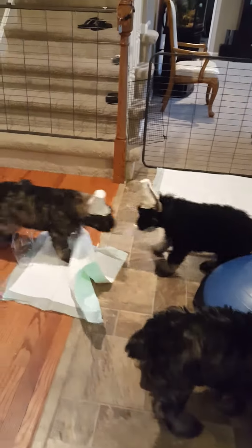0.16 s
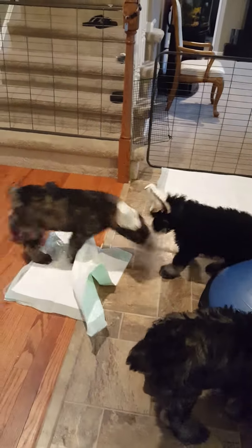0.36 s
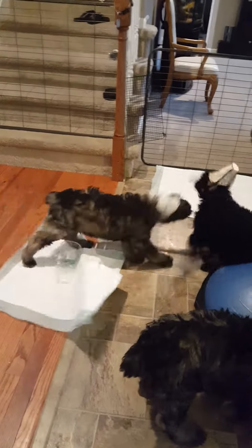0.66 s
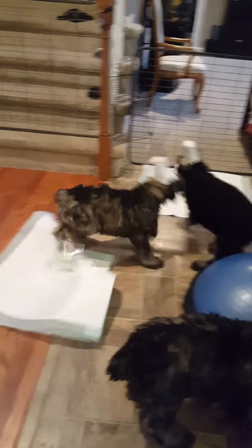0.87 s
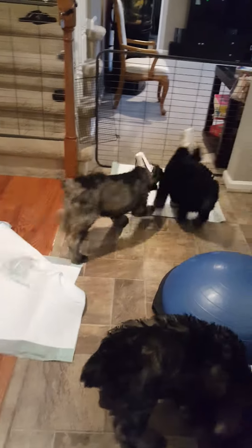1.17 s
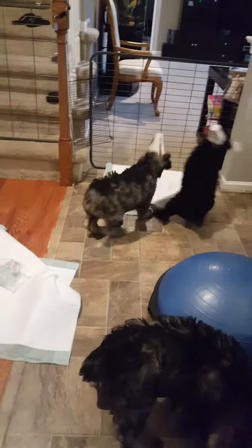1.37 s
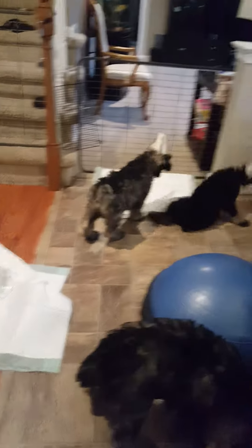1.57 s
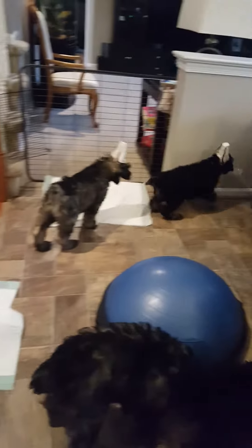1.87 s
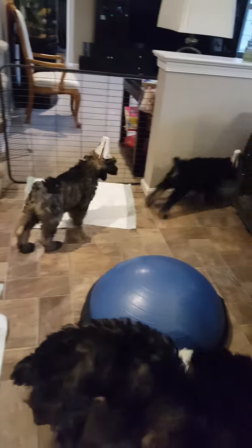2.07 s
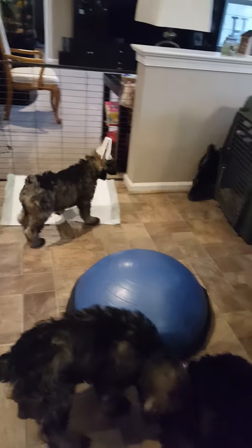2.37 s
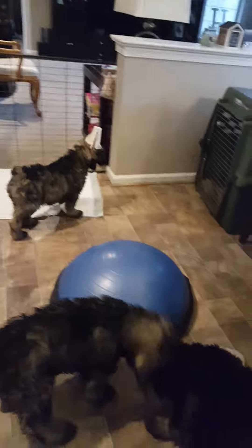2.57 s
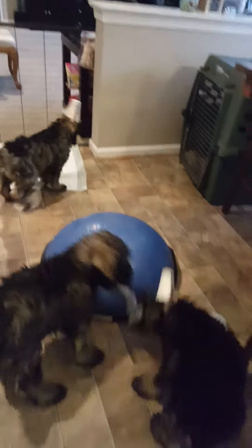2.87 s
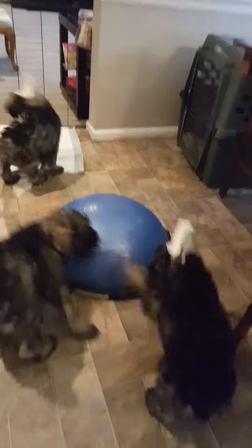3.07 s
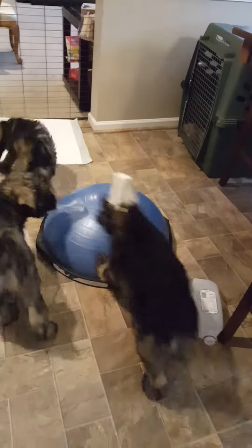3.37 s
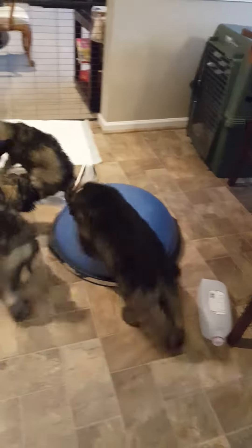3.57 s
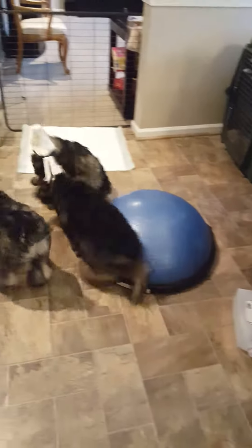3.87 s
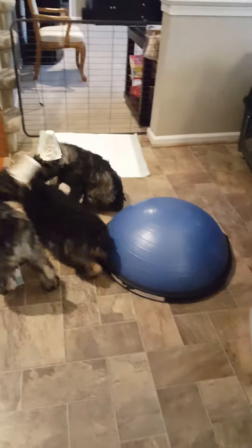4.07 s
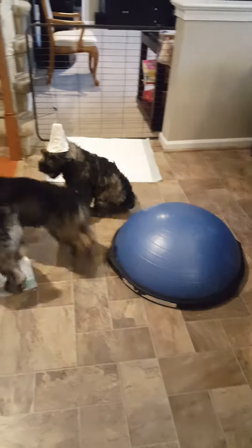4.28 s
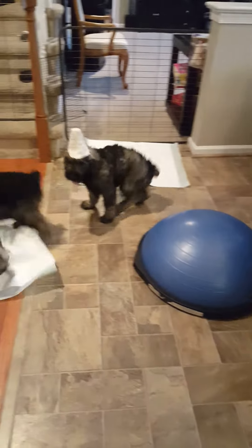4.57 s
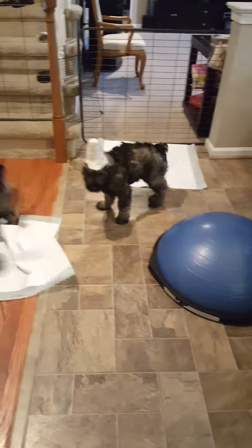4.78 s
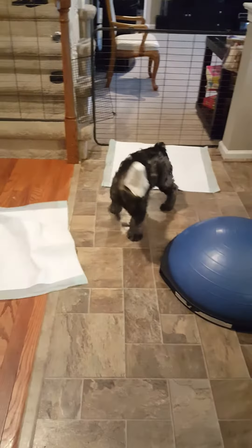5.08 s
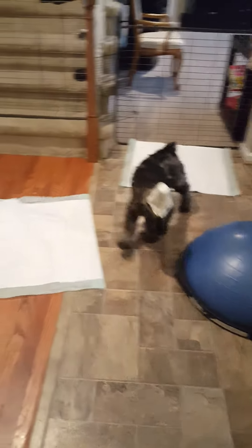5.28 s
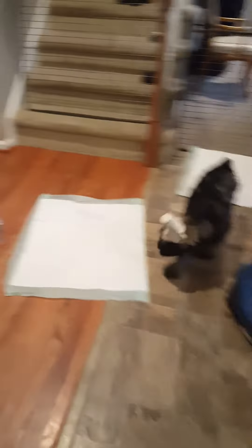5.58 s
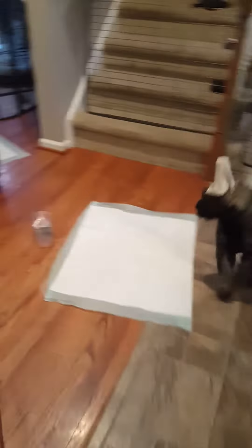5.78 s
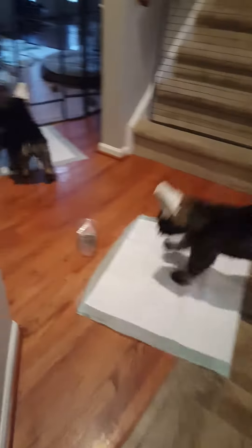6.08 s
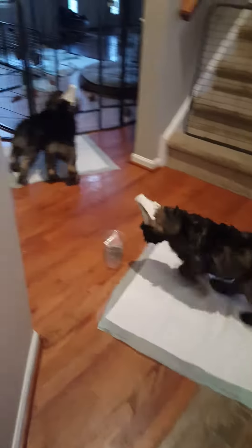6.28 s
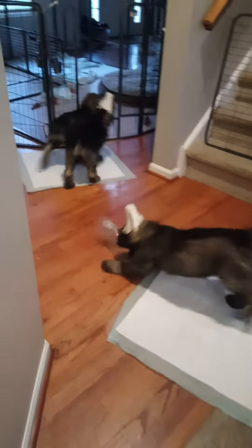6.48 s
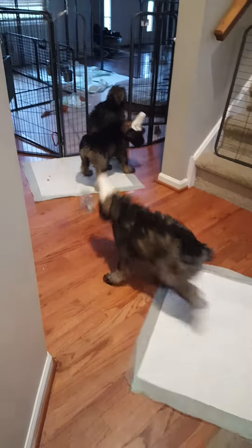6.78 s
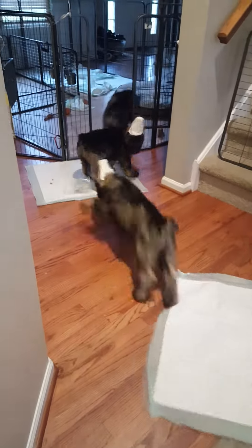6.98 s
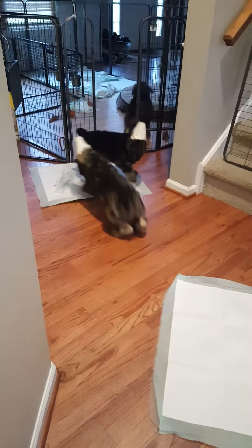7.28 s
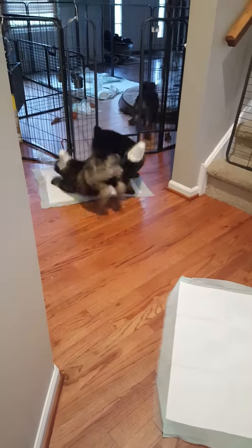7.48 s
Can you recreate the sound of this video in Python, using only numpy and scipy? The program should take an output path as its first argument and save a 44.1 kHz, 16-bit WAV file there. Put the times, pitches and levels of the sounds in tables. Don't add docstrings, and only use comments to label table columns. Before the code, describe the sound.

In a hard-walled home hall, puppies romp around an empty plastic bottle. An early loud hollow knock and plastic snaps give way to claws ticking and feet scuffling on tile, another hard knock just after one second, then softer thumps. Later the play moves to wooden boards, with the bottle bouncing again and a very loud knock around six and a half seconds. A handheld stereo microphone catches short echoes and a low house hush.

```python
import sys
import numpy as np
from scipy import signal
from scipy.fft import rfft, irfft
from scipy.io import wavfile

SR = 44100
rng = np.random.default_rng(int(sys.argv[2]) if len(sys.argv) > 2 else 0)


def elevation(decibels):
    levels = np.asarray(decibels, float)
    return 10 ** (levels / 20)


def transcribe(signal):
    frames = np.atleast_2d(signal).T
    limited = np.clip(frames, -1, 1)
    pcm = np.round(limited * 32767).astype(np.int16)
    wavfile.write(sys.argv[1], SR, pcm)


N = 336924

# (time [s], peak [dB], wall pitch [Hz], echo share [dB])
BOTTLE_KNOCKS = [(0.214, -22.5, 1000, -9), (0.321, -5.5, 600, -4.5), (0.514, -16, 523, -5),
                 (0.568, -29, 530, 1), (1.254, -7, 580, -3.5), (1.309, -23, 630, 4),
                 (1.531, -29.5, 683, 1.5), (2.699, -21, 454, -11), (2.984, -17, 990, -6),
                 (3.109, -24.5, 1180, -4), (3.167, -21.5, 1180, -5), (3.471, -17, 1320, -22),
                 (4.727, -23.5, 1080, -3), (4.96, -20, 514, -4), (5.298, -14, 660, 0),
                 (5.445, -18.5, 654, -2.5), (5.646, -27, 575, -8), (5.703, -27.5, 690, 2.5),
                 (6.503, -4.5, 610, -4), (6.643, -15.5, 1070, -11), (6.718, -16, 680, 8),
                 (7.421, -23, 720, 8.5), (7.469, -17.5, 1220, 0.5), (7.594, -8, 650, -1.5)]
# (time [s], peak [dB], wall pitch [Hz], echo share [dB])
BOTTLE_BOUNCES = [(0.235, -15, 680, -2), (0.823, -23, 550, -1), (0.93, -25.5, 490, -4),
                  (0.965, -15, 458, -3), (1.794, -27.5, 930, 6.5), (2.094, -27.5, 576, -5),
                  (2.677, -26.5, 910, 0), (3.915, -29, 510, 2), (3.98, -22.5, 1360, -29),
                  (4.581, -10.5, 560, -3.5), (4.727, -18, 523, -1), (4.942, -17.5, 1090, -3.5),
                  (5.064, -24, 720, 2), (5.201, -22, 610, 1.5), (5.402, -20, 534, -5), (5.469, -25, 623, 4),
                  (6.457, -16, 550, 0), (6.853, -21.5, 730, 0.5), (7.327, -30, 584, 10),
                  (7.435, -11, 520, 2), (7.567, -23, 486, 5)]
AIR_TONE_HZ = 245.4
KNOCK_AIR_DB, BOUNCE_AIR_DB = -17, -5

# (time [s], peak [dB], floor pitch [Hz])
TILE_THUMPS = [(0.248, -33, 226), (0.315, -21, 185), (0.469, -19.5, 181), (0.673, -28.5, 150),
               (0.957, -22.5, 224), (1.068, -21.5, 142), (1.295, -25, 162), (1.537, -20, 151),
               (1.849, -20.5, 158), (2.067, -26, 127), (2.247, -22, 186), (2.296, -24, 163),
               (2.623, -31.5, 133), (3.034, -25, 153), (3.106, -32, 125), (3.242, -30.5, 130),
               (3.345, -35.5, 136), (3.4, -27, 149), (3.575, -23.5, 122), (3.698, -28, 194),
               (3.72, -26.5, 140), (3.836, -20, 108), (3.924, -17, 166), (3.959, -21, 106),
               (4.046, -25, 122), (4.304, -35.5, 102), (4.418, -33, 108)]
# (time [s], peak [dB], floor pitch [Hz])
BOARD_THUMPS = [(4.585, -26, 226), (4.771, -26, 237), (4.937, -28, 101), (5.026, -22, 107),
                (5.136, -27.5, 96), (5.333, -30, 173), (5.469, -18, 142), (5.738, -32, 103),
                (6.086, -30, 129), (6.184, -27, 101), (6.26, -27, 195), (6.485, -20.5, 106),
                (6.728, -24.5, 168), (6.856, -25.5, 165), (6.923, -26, 121), (7.045, -13, 140),
                (7.14, -30, 146), (7.226, -23, 97), (7.429, -13.5, 219), (7.6, -15, 147)]

# (time [s], peak [dB], pitch [Hz], edge [dB])
PLASTIC_CRACKS = [(0.1329, -29.5, 2550, -1), (0.2364, -10.5, 2480, -2), (0.3206, -21.5, 2670, -2.5),
                  (0.4708, -24, 2680, -3), (0.767, -31.5, 2580, -17), (0.827, -34, 2600, -18),
                  (1.37, -29, 2880, 2), (1.9635, -28.5, 5200, 12.5), (2.4289, -28.5, 4030, 15.5),
                  (2.6686, -18, 6540, -40), (2.7731, -26, 3700, 23), (3.473, -17, 3470, 7.5),
                  (3.5178, -14.5, 3830, 1.5), (3.8297, -31.5, 2580, -9), (3.9143, -24.5, 3600, -11),
                  (4.4597, -35.5, 5030, 0), (4.5808, -23.5, 1900, -4), (4.9084, -26.5, 3670, 1),
                  (4.9403, -16.5, 2650, -4), (5.2004, -11.5, 3150, -2.5), (5.4848, -21.5, 3020, -29),
                  (6.1384, -38.5, 3630, 0), (6.3001, -33.5, 2730, -13), (6.4592, -14.5, 3650, 1.5),
                  (6.5026, -14, 3620, -7), (6.6435, -14.5, 2380, 1.5), (6.7161, -17, 3400, -3),
                  (7.427, -22, 2600, -3), (7.5656, -24.5, 3540, 0)]
# (time [s], peak [dB], pitch [Hz], edge [dB])
CLAW_TICKS = [(0.2149, -13.5, 2310, -8), (0.5737, -17, 2220, -6.5), (0.9247, -34, 4040, 16.5),
              (1.2994, -38, 4140, 11.5), (1.4671, -22, 2880, 5), (1.574, -32, 3830, -14),
              (1.5987, -41, 3800, 26.5), (1.6716, -29.5, 3750, -4), (1.7938, -35, 3400, 2),
              (1.8082, -26, 2820, -6), (1.8208, -32, 2940, 11.5), (2.1575, -29, 2800, -17),
              (2.2827, -11.5, 4260, -28), (2.7427, -16.5, 3200, 9), (2.9324, -12.5, 2600, -19),
              (2.9433, -17, 3260, 10), (2.9842, -9, 2400, -8), (3.4488, -14, 3280, -11),
              (3.945, -27, 3200, 2), (3.982, -14.5, 2850, 0.5), (4.1883, -33, 3900, 3.5),
              (4.8462, -20.5, 3700, -38), (5.2995, -23, 2770, -24), (5.4132, -17, 3250, -33),
              (5.453, -19, 2900, -27), (5.5907, -28.5, 3280, 3.5), (6.7439, -15, 2840, -2),
              (6.8368, -28, 2900, -22), (7.5945, -14, 3000, -5)]
# (time [s], peak [dB], pitch [Hz], edge [dB])
PAD_CLAW_TICKS = [(0.512, -16, 3250, -40), (1.17, -32, 3700, -23), (1.508, -27.5, 4580, -15),
                  (1.8988, -30, 4670, -25), (2.2488, -27, 4480, -16), (2.595, -22.5, 4160, -8),
                  (2.6364, -24.5, 5100, 9), (3.037, -18, 2820, -24), (3.4276, -33, 3400, -24),
                  (5.3702, -16.5, 3360, -33), (5.5084, -35, 3120, -26), (5.5238, -25, 3040, -23)]
SNAP_BODY_HZ, SNAP_EDGE_HZ, CRACK_S = 1190, 10000, 0.00055
CRACK_BODY_DB, CLAW_BODY_DB, PAD_BODY_DB = -1.5, -16.5, -7.0
ECHO_AT_FULL_DB, ECHO_PER_DB, PAD_ECHO_DB = -2, -0.17, -19

# (time [s], level [dB], weight on the floor [dB], claw sharpness [dB])
TILE_SCUFFLES = [(-0.03, -33.5, 2.5, -4), (0.301, -24, -23, -11.5), (0.45, -29.5, -0.5, -14),
                 (0.598, -29.5, -3, -5.5), (0.85, -44.5, 15, 5), (1.0, -33, 4, -14.5), (1.13, -43.5, -1, 3),
                 (1.24, -36, 2, -8.5), (1.4, -35, -10, -8.5), (1.55, -31.5, 3, -8), (1.79, -35, -16, -2.5),
                 (1.9, -34, 2, -13), (2.05, -35, -4, -9.5), (2.2, -37.5, -14, -1.5), (2.349, -37, 6, -0.5),
                 (2.61, -37.5, 2, -2), (2.72, -33, -25, 0.5), (2.87, -39, 2, -0.5), (3.1, -33, 3, -1),
                 (3.24, -42, 8.5, -1), (3.42, -33.5, 4.5, -7.5), (3.58, -41.5, 4, 2.5), (3.85, -43, 16, -8),
                 (4.05, -40.5, 7, 1.5), (4.17, -60.5, 27.5, -2), (4.4, -45, 7.5, -4)]
# (time [s], level [dB], weight on the floor [dB], claw sharpness [dB])
BOARD_SCUFFLES = [(4.47, -36.5, -9, -5.5), (4.682, -27, 0, -13), (4.85, -33.5, -4, -8),
                  (5.0, -29, -15, -13.5), (5.25, -39.5, 7, 5), (5.45, -32.5, -4, -14), (5.62, -37.5, 0, -3),
                  (5.75, -43, 7, -7.5), (6.151, -46.5, 18, -12), (6.318, -53.5, 7, 8),
                  (6.6, -27, -3.5, -14.5), (6.8, -31, 3, -8.5), (6.951, -33, 10.5, -6.5),
                  (7.151, -36.5, 15, -10.5), (7.298, -39.5, 13.5, -9), (7.5, -34, 8, -3.5),
                  (7.64, -22, -12, -5.5)]
RUSTLE_DB, RUSTLE_FOLLOWS = -20.5, 0.7
SCUFFLE_RISE_DB_PER_S, SCUFFLE_FALL_DB_PER_S = 119, 120.0

# (time [s], level [dB])
PAD_DRAGS = [(0.45, -43), (1.0, -41), (1.2, -42.5), (1.7, -40.5), (1.95, -59), (2.2, -40.5), (2.85, -37),
             (3.0, -39), (4.85, -39), (5.45, -38.5), (6.05, -57), (6.3, -44.5), (6.55, -43), (6.95, -40),
             (7.05, -40.5)]
DRAG_RISE_DB_PER_S, DRAG_FALL_DB_PER_S = 79, 117
HOLD_S, FLUTTER_DB = 0.023, 2.5

# (frequency [Hz], density [dB per Hz])
HUSH_SPECTRUM = [(15, -52), (25, -5), (134, -2), (500, -7.5), (1400, -18.5), (5570, -32), (13200, -37.5),
                 (16000, -32)]
HUSH_DB = -53
# (frequency [Hz], decay time [s])
HALL_DECAY = [(100, 0.22), (300, 0.45), (800, 0.32), (2000, 0.58), (5000, 0.24), (13000, 0.25)]
# (frequency [Hz], side over mid [dB])
SIDE_SHARE = [(60, -39), (125, -22), (250, -13.5), (500, -8), (1000, 0), (4000, 0), (13000, 0.5)]
# (frequency [Hz], left over right [dB])
PORT_TILT = [(60, -0.5), (500, 2), (1000, 1.5), (2000, 1.3), (4000, -2.5), (8000, -0.8), (13000, 5)]
# (frequency [Hz], gain [dB])
MIC_COLOUR = [(30, 1), (110, 0), (200, -1), (370, -2), (600, 0.5), (1900, 2.5), (8000, 3), (15500, -10.5)]
HALF_OCTAVE_EDGES_HZ = 28 * 2 ** np.arange(0, 9.4, .5)


def bottle():
    near, sent = np.zeros(N), np.zeros(N)
    for rows, air_db in ((BOTTLE_KNOCKS, KNOCK_AIR_DB), (BOTTLE_BOUNCES, BOUNCE_AIR_DB)):
        for s, peak_db, wall_hz, echo_db in rows:
            for out, extra_db in ((near, 0), (sent, min(echo_db, 3))):
                wall_db = peak_db + extra_db
                add_contact(out, s, wall_db, wall_hz, cycles=2.2)
                add_contact(out, s + 0.00088, wall_db + air_db - 1.5, AIR_TONE_HZ, cycles=3.1)
    direct = near * elevation([[1.2], [-1.2]])
    echo = hall(sent, echo_db=5.0, gap_s=0.00078, lumpy_db=1.0, close_db=4.0, close_s=0.017)
    knock = direct + echo
    return knock - .45 * band(knock, 310, 430)


def paws():
    near = np.zeros(N)
    for s, peak_db, floor_hz in TILE_THUMPS + BOARD_THUMPS:
        add_contact(near, s, peak_db, floor_hz, cycles=2.09)
    return near + hall(near, echo_db=5.0, gap_s=0.0076, lumpy_db=1.0, close_db=9.5, close_s=0.26)


def snaps():
    near, sent = np.zeros((2, N + 1024)), np.zeros(N + 1024)
    rise = np.arange(512) / SR / CRACK_S
    crack_shape = rise * np.exp(1 - rise)
    kinds = ((PLASTIC_CRACKS, CRACK_BODY_DB, 0),
             (CLAW_TICKS, CLAW_BODY_DB, 0),
             (PAD_CLAW_TICKS, PAD_BODY_DB, PAD_ECHO_DB))
    for rows, body_db, damp_db in kinds:
        for s, peak_db, hz, edge_db in rows:
            tip = snap_tip(peak_db, hz, edge_db, body_db)
            splinter = rng.standard_normal((2, 512)) * crack_shape
            crack = signal.fftconvolve(tip[None], splinter, axes=1)
            echo_db = min(ECHO_AT_FULL_DB + ECHO_PER_DB * peak_db, 6) + damp_db
            at = round(s * SR)
            near[:, at:at + 1024] += elevation([[-14.5], [-13.5]]) * crack
            sent[at:at + 513] += tip * elevation(echo_db)
    return near[:, :N] + hall(sent[:N], echo_db=0, gap_s=.002, lumpy_db=2.5, close_db=4.0, close_s=.05)


def snap_tip(peak_db, hz, edge_db, body_db):
    tip = np.zeros(513)
    ring_cycles = np.clip(1.4 * (hz / 3300) ** 4, 1.4, 3.5)
    add_contact(tip, 0, peak_db, hz, ring_cycles)
    add_contact(tip, .001, peak_db + body_db, SNAP_BODY_HZ, cycles=2.59)
    add_contact(tip, 0, peak_db + edge_db + 3, SNAP_EDGE_HZ, cycles=.9)
    return tip


def scrabble():
    bodies = [(69, 294, 83), (366, 1041, 180), (1100, 5860, 490), (5400, 13800, 750)]
    near = 0
    for gain, (low_hz, high_hz, per_s) in zip(scuffle_gains(), bodies):
        sizes = grain_sizes(N, 4.0, per_s)
        mid = rng.choice([-1, 1], N)
        side = rng.standard_normal(N) * elevation(at_hz(SIDE_SHARE, np.sqrt(low_hz * high_hz)))
        clicks = sizes * np.array([mid + side, mid - side])
        dealt = rng.integers(0, 4, N)
        edges = np.geomspace(low_hz, high_hz, 5)
        grains = 0
        for k in range(4):
            pitched = band(clicks * (dealt == k) + 1e-18, edges[k], edges[k + 1])
            grains = grains + pitched / np.sqrt(edges[k])
        near = near + rms_one(grains) * gain * elevation(-10.5)
    return near + hall(near[0], echo_db=2, gap_s=.002, lumpy_db=1.5, close_db=0, close_s=.05)


def scuffle_gains():
    s, level_db, weight_db, sharp_db = np.transpose(TILE_SCUFFLES + BOARD_SCUFFLES)
    scratch_db = level_db + sharp_db
    rustle_db = RUSTLE_DB + RUSTLE_FOLLOWS * scratch_db
    peaks_db = [level_db + weight_db, level_db, scratch_db, rustle_db]
    return [swells(s, db, SCUFFLE_RISE_DB_PER_S, SCUFFLE_FALL_DB_PER_S) for db in peaks_db]


def pads():
    grains = grain_sizes((2, N), 3.0, 3000) * rng.choice([-1, 1], (2, N))
    hiss = rms_one(band(grains, low_hz=7700.0, high_hz=20100.0))
    s, level_db = np.transpose(PAD_DRAGS)
    return hiss * elevation(-8.0) * swells(s, level_db, DRAG_RISE_DB_PER_S, DRAG_FALL_DB_PER_S)


def house_hush():
    noise = diffuse(N, lambda hz: elevation(at_hz(HUSH_SPECTRUM, hz)))
    return elevation(HUSH_DB) * rms_one(noise)


def hall(x, echo_db, gap_s, lumpy_db, close_db, close_s):
    t = np.arange(SR * 3 // 4) / SR
    lumps = elevation(lumpy_db * np.repeat(rng.standard_normal(len(t) // 64 + 1), 64)[:len(t)])
    close = elevation(close_db - 60 * t / close_s)
    onset = np.clip(t / gap_s - 1, 0, 1)

    def decay(hz):
        return close + elevation(-60 * t / at_hz(HALL_DECAY, hz)) * onset

    answer = diffuse(len(t), decay) * lumps
    answer = answer / np.sqrt(np.sum(answer ** 2) / 2)
    return elevation(echo_db) * signal.fftconvolve(x[None], answer, axes=1)[:, :N]


def diffuse(length, gain_of_band):
    out = 0
    white = rng.standard_normal((2, 2, length))
    for k, (low, high) in enumerate(zip(HALF_OCTAVE_EDGES_HZ, HALF_OCTAVE_EDGES_HZ[1:])):
        mid, side = band(white[k % 2], low, high)
        hz = np.sqrt(low * high)
        stereo = mid + elevation(at_hz(SIDE_SHARE, hz)) * side * np.array([[1], [-1]])
        out = out + gain_of_band(hz) * stereo
    return out


def add_contact(out, s, peak_db, hz, cycles):
    cycles = max(cycles, .5)
    turns = np.arange(int(3 * cycles * SR / hz)) * hz / SR
    swell = turns * 3 / cycles
    pulse = elevation(peak_db) * (swell * np.exp(1 - swell)) ** 2 * np.sin(2 * np.pi * turns)
    at = max(round(s * SR), 0)
    out[..., at:at + len(pulse)] += pulse[:N - at]


def grain_sizes(shape, spread_db, per_s):
    sizes = elevation(spread_db * np.minimum(rng.exponential(1, shape), 3.5))
    return sizes * (rng.random(shape) < per_s / SR)


def swells(s, peak_db, rise_db, fall_db):
    t = np.arange(0, N, 64) / SR
    late = t[:, None] - s
    shape_db = np.where(late < 0, rise_db * late, -fall_db * np.maximum(late - HOLD_S, 0))
    flutter = elevation(FLUTTER_DB * np.repeat(rng.standard_normal(len(t) // 12 + 1), 12)[:len(t)])
    gain = np.sqrt(np.sum(elevation(shape_db + peak_db) ** 2, axis=1))
    return np.interp(np.arange(N) / SR, t, flutter * gain)


def rms_one(x):
    return x / np.sqrt(np.mean(x ** 2) + 1e-20)


def at_hz(points, hz):
    table_hz, value = np.transpose(points)
    return np.interp(np.log(hz), np.log(table_hz), value)


def band(x, low_hz, high_hz):
    sos = signal.butter(2, [low_hz, min(high_hz, .45 * SR)], "band", fs=SR, output="sos")
    return signal.sosfilt(sos, x)


def scene():
    return bottle() + paws() + snaps() + scrabble() + pads() + house_hush()


def low_pass(x):
    return signal.sosfilt(signal.butter(12, 16490, fs=SR, output="sos"), x)


def record(dry):
    hz = np.fft.rfftfreq(N, 1 / SR) + 1
    tilt = elevation(at_hz(MIC_COLOUR, hz) + at_hz(PORT_TILT, hz) * np.array([[.5], [-.5]]))
    ports = irfft(rfft(dry, axis=1) * tilt, N, axis=1)
    ports = signal.sosfilt(signal.butter(2, 65, "high", fs=SR, output="sos"), ports)
    ports = signal.sosfilt(signal.cheby2(10, 50, 16800, fs=SR, output="sos"), ports)
    mix = 1.675 * np.tanh(ports / 1.177)
    return low_pass(mix)


dry = scene()
out = record(dry)
transcribe(out)
```